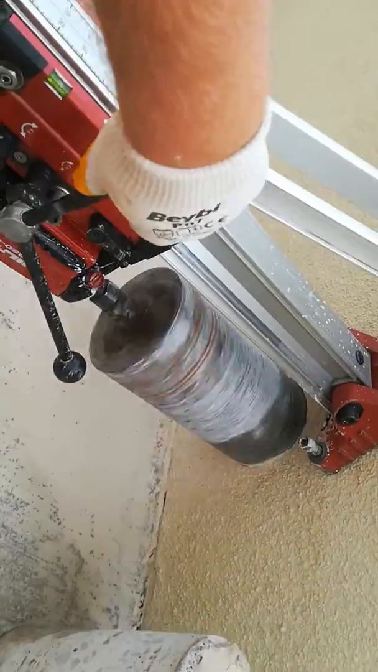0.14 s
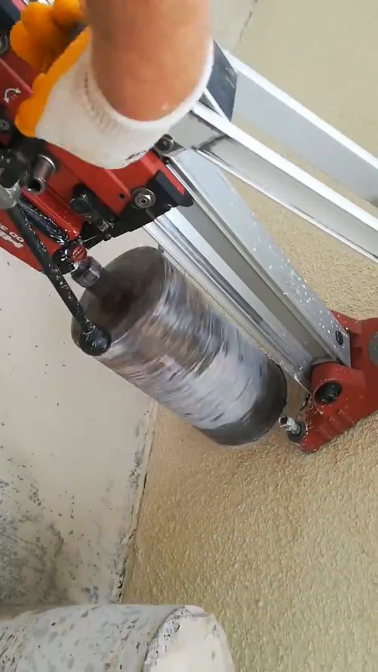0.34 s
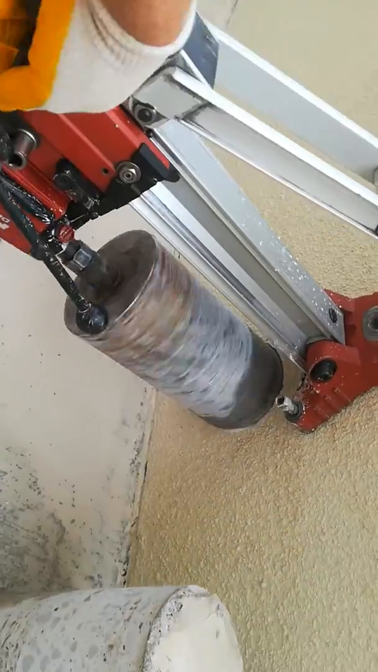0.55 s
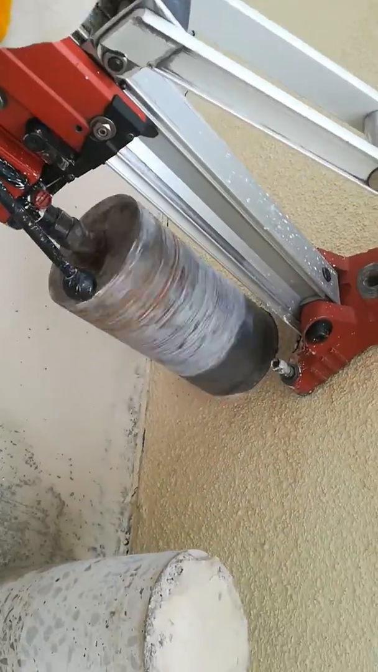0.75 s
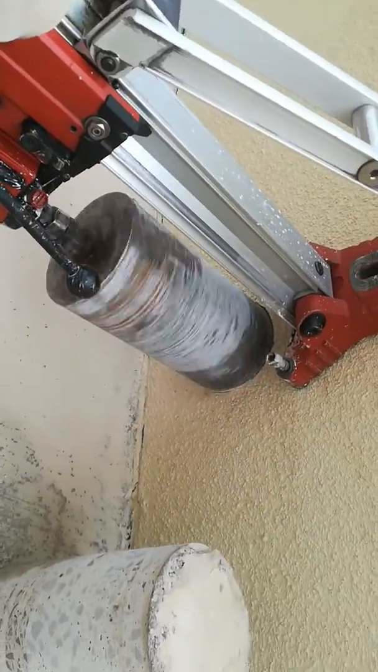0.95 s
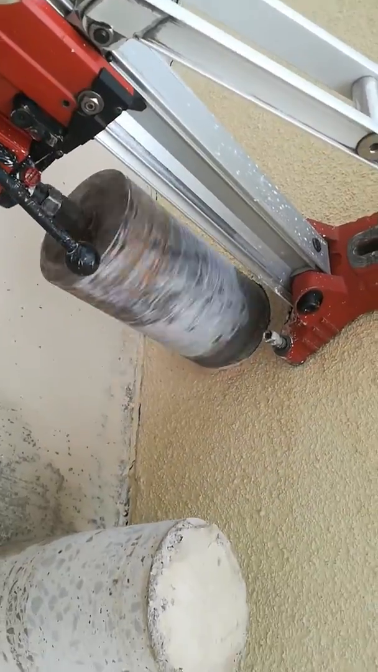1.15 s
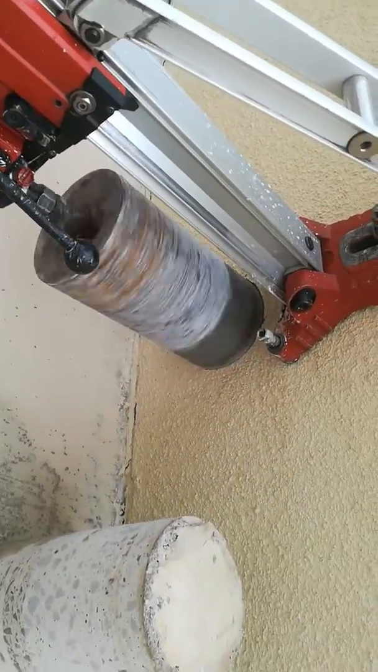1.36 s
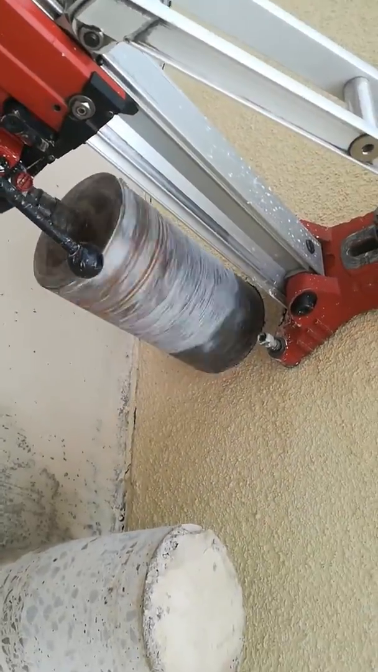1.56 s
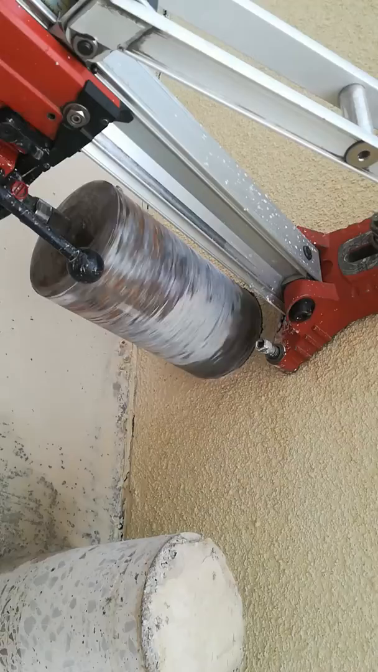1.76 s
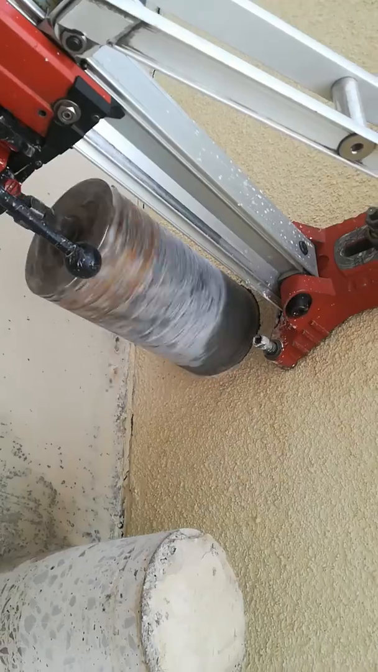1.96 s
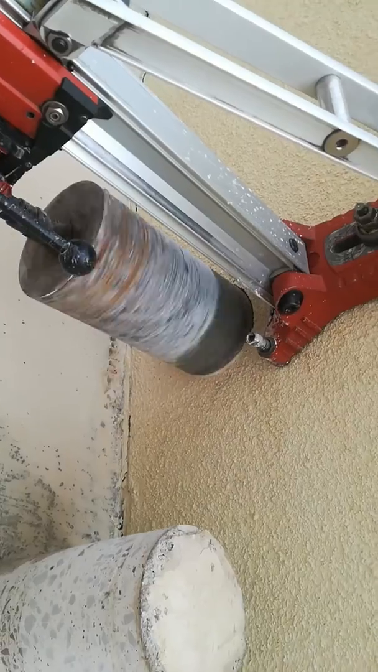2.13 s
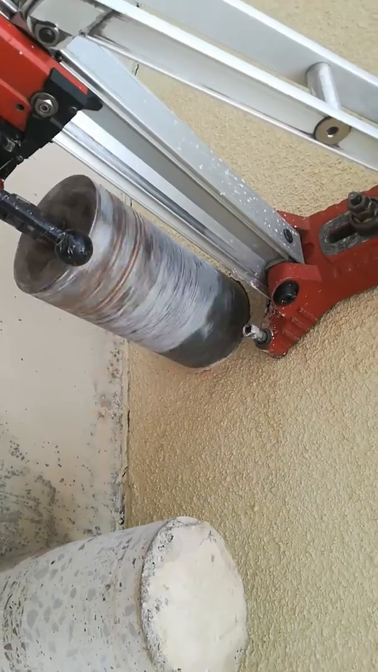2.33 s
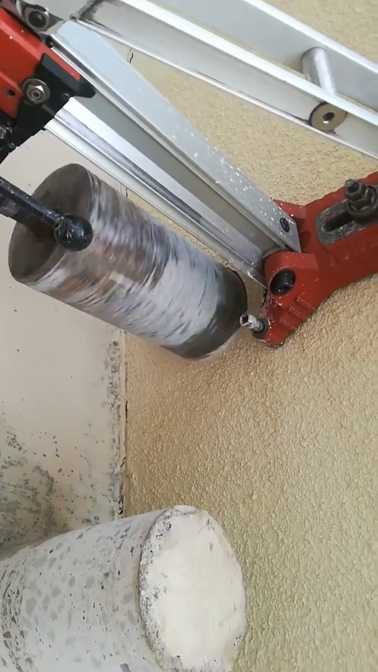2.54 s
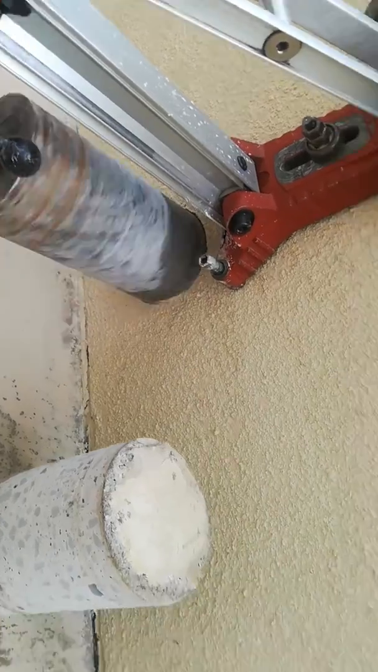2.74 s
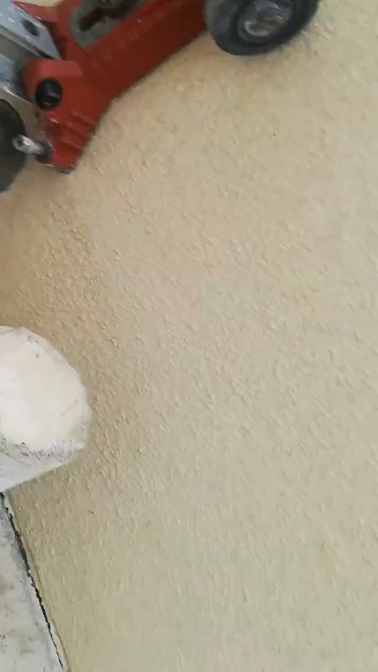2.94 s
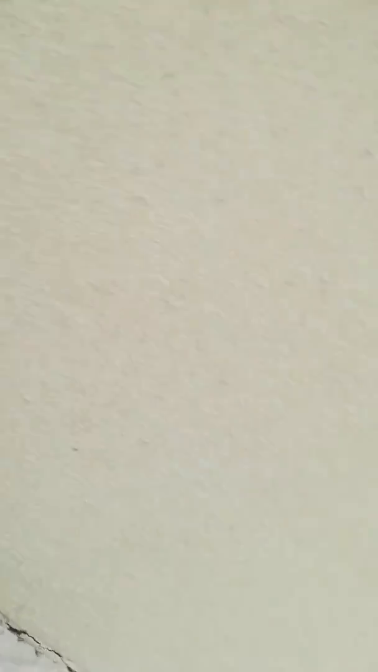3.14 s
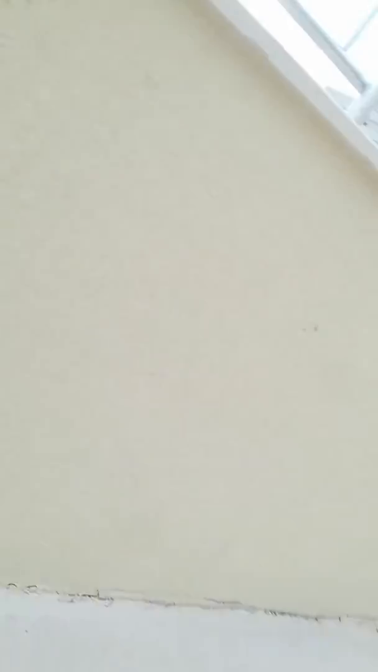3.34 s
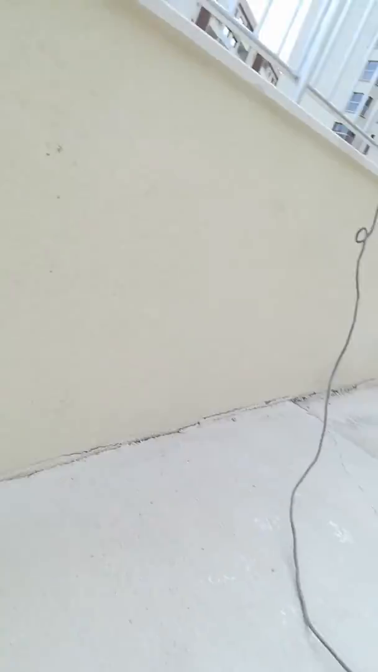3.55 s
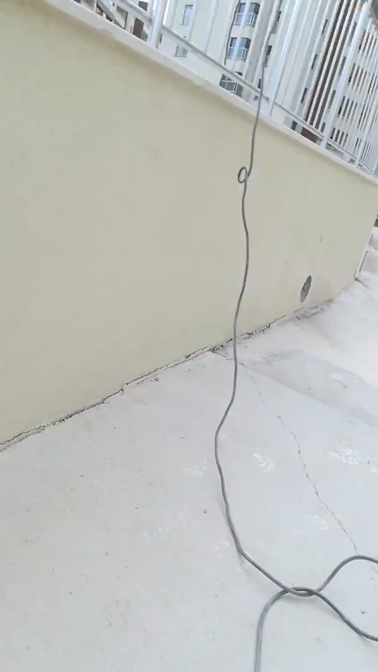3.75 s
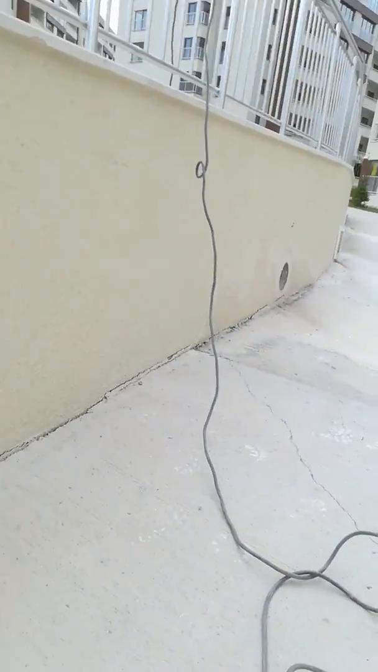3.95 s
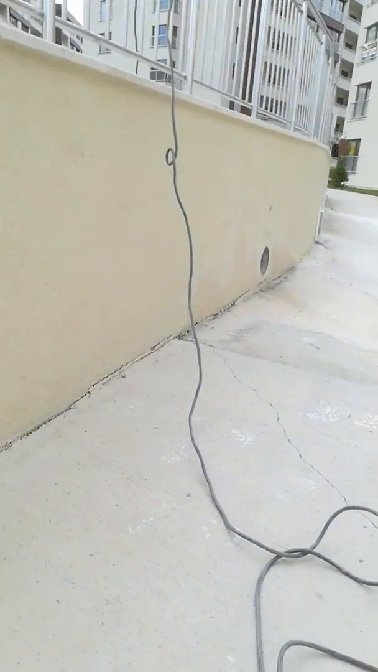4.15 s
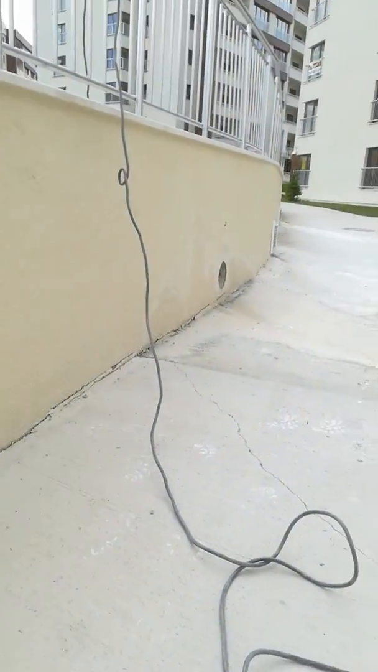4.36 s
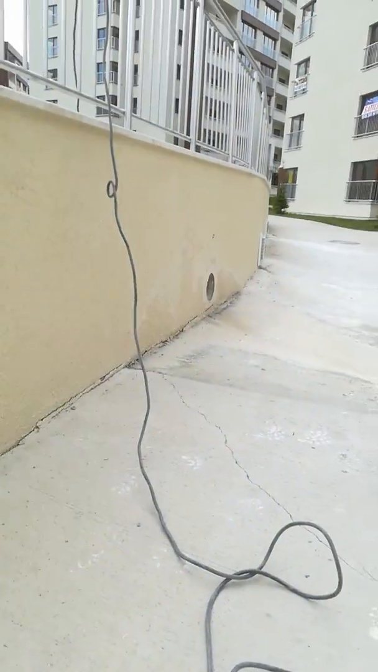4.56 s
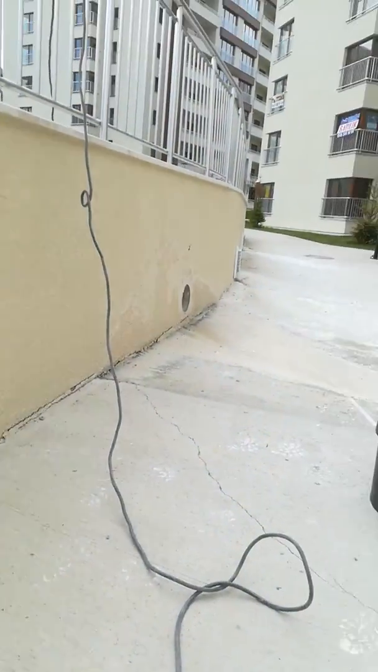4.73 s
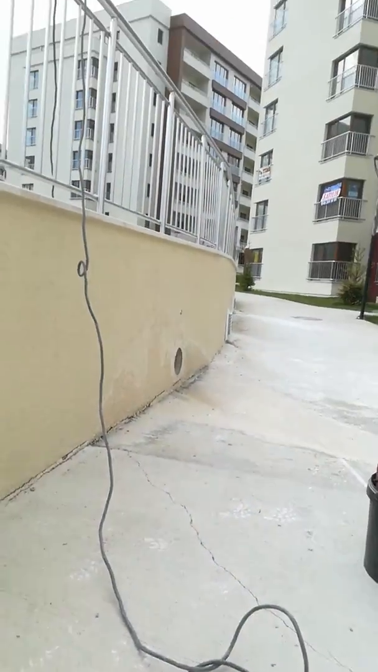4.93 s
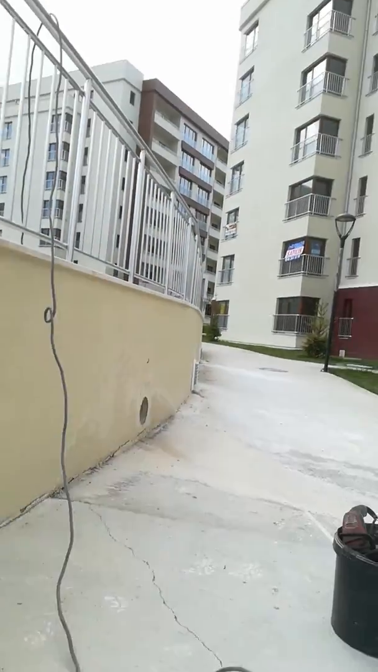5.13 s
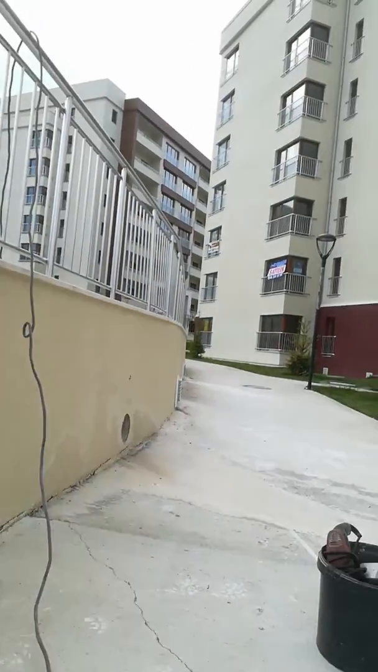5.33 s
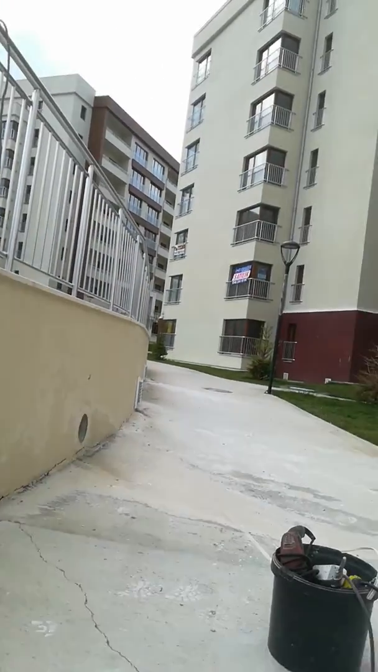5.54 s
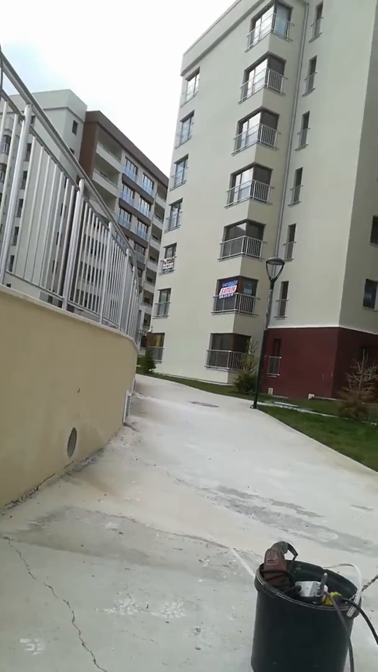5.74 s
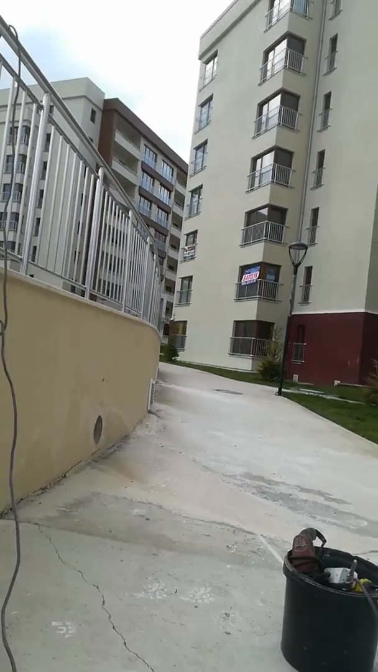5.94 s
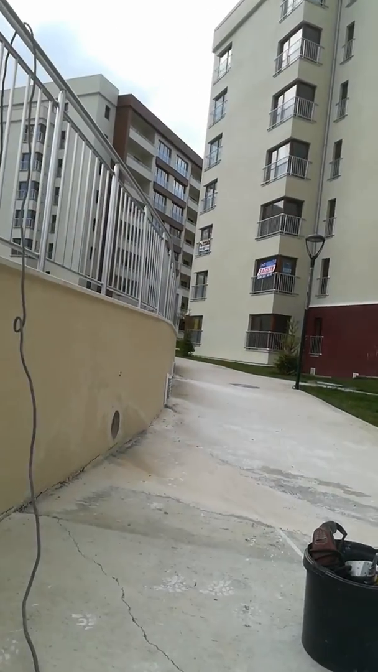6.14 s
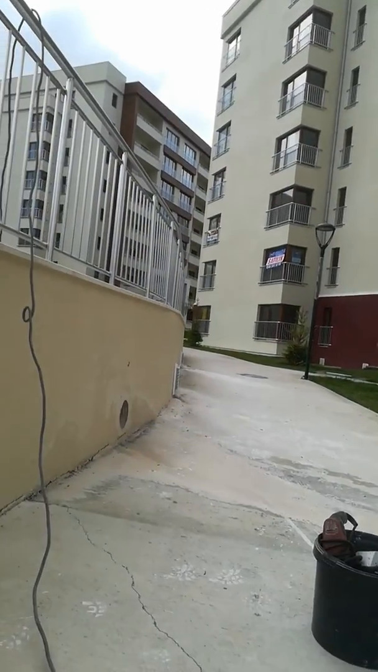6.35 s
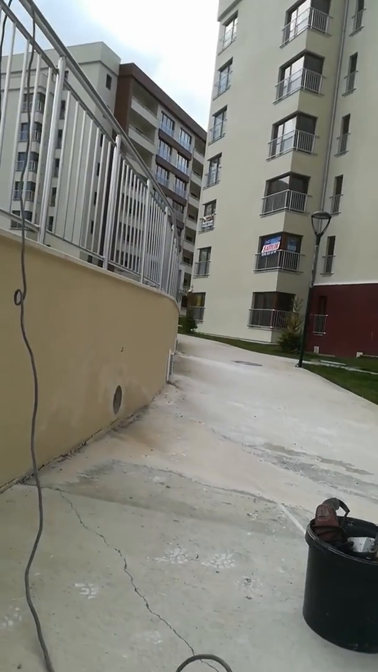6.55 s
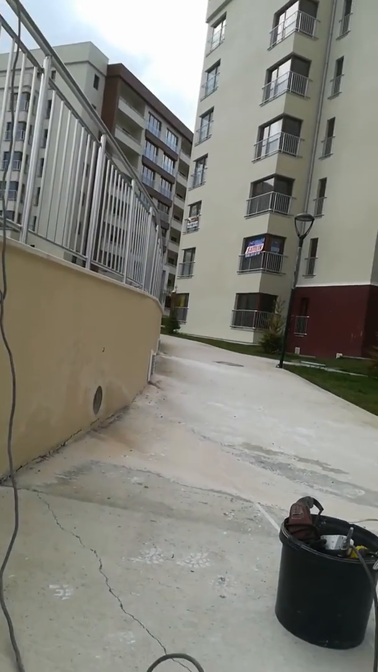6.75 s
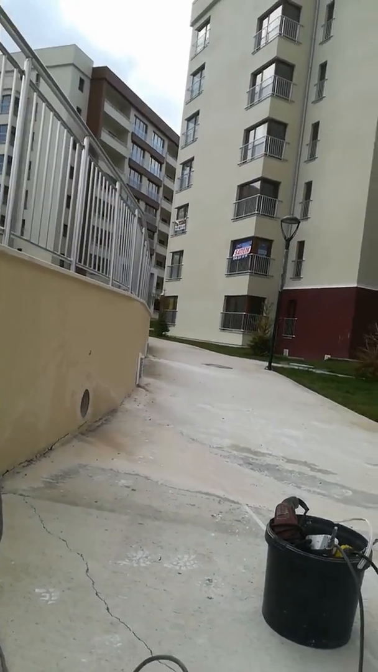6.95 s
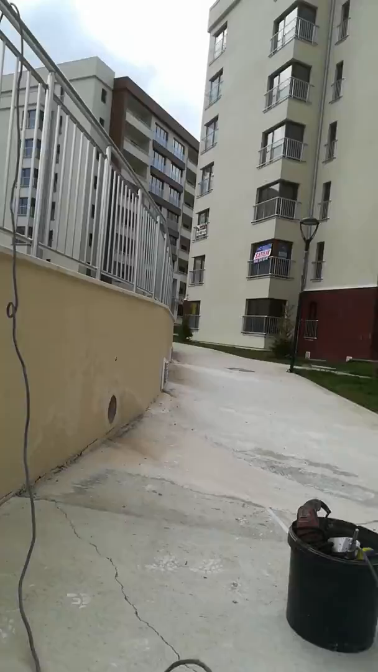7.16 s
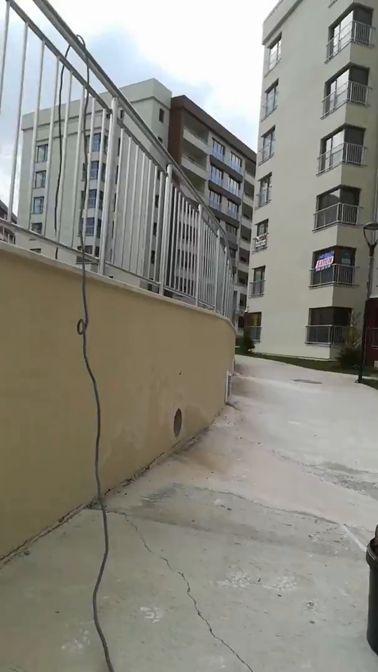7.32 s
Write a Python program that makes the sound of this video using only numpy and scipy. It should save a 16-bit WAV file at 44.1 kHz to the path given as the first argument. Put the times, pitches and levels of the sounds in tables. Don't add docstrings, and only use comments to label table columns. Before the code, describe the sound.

A core drill cuts concrete without pause, very loud and close. Its harsh, gritty rasp throbs around six times per second, with ringing metal in the barrel, a sharp tick each turn, low stand rumble and a buried motor hum. Heard outdoors on a handheld stereo phone, it begins slightly shaded, opens up bright, then after three seconds shifts to the left as the phone turns away.

```python
import sys
import numpy as np
from scipy import signal
from scipy.fft import rfft, irfft
from scipy.io import wavfile
from scipy.ndimage import uniform_filter1d, map_coordinates

SR = 44100
rng = np.random.default_rng(int(sys.argv[2]) if len(sys.argv) > 2 else 0)


def wav_record(signal):
    frames = np.transpose(np.atleast_2d(signal))
    bounded = np.clip(frames, -1, 1)
    quanta = np.round(bounded * 32767).astype(np.int16)
    wavfile.write(sys.argv[1], SR, quanta)


def nominal_scale(level):
    x = np.asarray(level, float) / 20
    return 10 ** x


N = 330309

# (time [s], speed [turns/s])
SPEED = [(0.15, 6.408), (0.45, 6.359), (1, 6.361), (2.43, 6.394), (2.65, 6.362), (3.6, 6.393),
         (4.01, 6.374), (5.15, 6.405), (6, 6.384), (7.49, 6.388)]


def read(points, hz):
    f, *columns = np.transpose(points)
    return np.array([np.interp(np.log(hz + 1), np.log(f + 1), c) for c in columns])


def follow(points, t):
    s, *columns = np.transpose(points)
    return np.array([np.interp(t, s, c) for c in columns])


def flutter(size):
    x = uniform_filter1d(uniform_filter1d(rng.standard_normal(N), size), size)
    return x / np.std(x)


def peak(hz, centre_hz, width_hz):
    return 1 / (1 + (2 * (hz - centre_hz) / width_hz) ** 2)


def bump(t, events):
    return sum(db * np.exp(-((t - at) / length) ** 2) for at, length, db in events)


def posture(t):
    # (time [s], pose [0 shaded by the hand, 1 facing, 2 turning, 3 side-on, 4 turned away])
    pose_path = [(0, 0.), (.28, 0.), (.36, 0.37), (.5, 0.5), (.7, 1.), (2.65, 1.), (2.9, 2.), (3.08, 2.),
                 (3.3, 2.5), (3.45, 3.), (3.6, 3.), (4.1, 4.), (7.49, 4.)]
    pose = np.clip(follow(pose_path, t)[0], 0, 4)
    weights = np.maximum(1 - abs(pose - np.arange(5)[:, None]), 0)
    away = np.clip((pose - 2) / 2.08, 0, 1)
    return weights, away


def rasp(angle, grit_db):
    # (frequency [Hz], share of the rasp that returns next turn [0-1], share surviving a further turn [0-1])
    groove_memory = [(100, 0.47, 0.98), (245, 0.69, 0.99), (605, 0.72, .95), (1000, 0.63, .93),
                     (1880, 0.84, .97), (2270, 0.55, 0.79), (4000, 0.39, 0.78), (8000, 0.07, 0.5)]
    tooth_steps = 6912
    turns = int(angle[-1]) + 2
    shape = (2, turns, tooth_steps)
    fresh = rng.standard_normal(shape) * nominal_scale(grit_db * rng.standard_normal(shape))
    chips, wear = rfft(fresh / np.std(fresh))
    returns, survives = np.clip(read(groove_memory, np.fft.rfftfreq(tooth_steps, 1 / SR)), 0, .999)
    groove = wear.copy()
    for k in range(1, turns):
        groove[k] = survives * groove[k - 1] + np.sqrt(1 - survives ** 2) * wear[k]
    surface = irfft(np.sqrt(returns) * groove + np.sqrt(1 - returns) * chips).ravel()
    return map_coordinates(surface, [angle * tooth_steps], order=1)


def bite(angle):
    # (angle [turns], half width [turns], level [dB])
    hard_stretches = [
        (.05, 0.075, 3.5),
        (.47, .15, 2.5),
        (.7, 0.13, 3.),
    ]
    hard_db = -2.
    for at, width, db in hard_stretches:
        offset = (angle - at + .5) % 1 - .5
        hard_db = hard_db + db * np.exp(-(offset / width) ** 2)
    lobes_db = hard_db * (1.08 + 0.23 * flutter(size=3000))
    return nominal_scale(lobes_db + 0.091 * flutter(size=500) + 0.76 * flutter(size=90))


def pose_colour(hz, weights):
    # (frequency [Hz], left level [dB], right level [dB])
    shaded = [(360, -23, -21), (550, -29, -25), (735, -27, -19), (903, -4.5, -6), (1170, -15.5, -17.5),
              (1540, -10, 1), (2250, -6, -1), (2550, -4, -6.5), (2850, -11.5, -3.5), (3800, -0.5, 0),
              (4800, -7.3, -9), (6400, -17.5, -12.0), (9300, -24.6, -20.5), (15000, -48, -38)]
    facing = [(360, -18, -21.5), (540, -21, -18.5), (726, -16.5, -16.6), (899, -4.5, -5.5),
              (1170, -14, -9.5), (1485, -3.5, -1), (2230, 0, 1), (2520, -1, -4.5), (2820, -0.6, -3.5),
              (3800, 5, 0.5), (4800, 0.5, -5.7), (6420, -10.5, -5.5), (9300, -20.5, -16),
              (14600, -33.2, -32.5)]
    turning = [(360, -20.3, -19), (550, -14, -20), (726, -14, -24), (874, -3.5, -8), (1170, -14, -10.5),
               (1480, -9, -0.5), (2250, -2.5, -1), (2550, -2, -9), (2850, 1, -11), (3800, 4, -4.5),
               (4800, -1.2, -1), (6530, -8.5, -3.5), (9400, -18.5, -17.6), (15000, -33, -19.5)]
    side_on = [(358, -21, -25.5), (550, -14.5, -22.7), (736, -16.5, -32), (910, -15, -14),
               (1170, -8.5, -11.5), (1440, -3, -8), (2190, -2, -10), (2550, -4, -15), (2880, 2, -15),
               (3850, 2, -1), (4640, 1.5, -14), (6540, -9, -17), (9250, -21.5, -26), (15000, -40, -37)]
    turned_away = [(352, -24, -31), (570, -12, -24.7), (730, -15, -22), (900, -13, -19), (1170, -13, -15),
                   (1410, -11, -19), (2190, -1.6, -15.5), (2530, -1.8, -20), (2870, 3.5, -18),
                   (3800, 0.15, -8.5), (4910, -0.46, -11), (6420, -7.5, -18), (9560, -19.5, -30),
                   (15000, -35.5, -49)]
    colours_db = np.array([read(p, hz) for p in (shaded, facing, turning, side_on, turned_away)])
    return np.einsum("pcf,pt->cft", colours_db, weights)


def body_colour(hz, away):
    # (frequency [Hz], width [Hz], facing left [dB], facing
    # right [dB], away left [dB], away right [dB])
    body_modes = [(413, 44, 3.5, -2, 5.5, 5), (496, 50, -3.5, -3, -2.5, -1), (603, 68, 0.5, 0, 3, -0.0),
                  (700, 70, 2, -1.5, 0.6, -4), (746, 40, -4, -3.5, -7, -2), (808, 43, 1.8, 4, 7, 8.5),
                  (857, 40, 2.1, 3, 1, -0.5), (944, 50, 3.2, 2, -4, -0.4), (1060, 57, 3.8, -6, -2, 3),
                  (1100, 55, 0.4, -17, 7.5, 5), (1323, 180, -5, -1, -6.5, -5),
                  (1640, 40, 0, 4.5, 7.5, -3), (1765, 74, -5, -2.7, -1, 3.7),
                    (1785, 44, -1.5, 1.5, -10, -1), (1965, 113, -8, -5.5, -2.5, -2),
                    (2155, 76, 5.5, 1.5, 4, 4), (2515, 64, -3, -10, -5.5, -2.2), (2808, 62, 4, 6, 2.5, -2),
                    (3240, 75, 3, -0.5, -2.8, 8), (3357, 170, -5.5, -3.5, -4, 0),
                    (4230, 180, -0.5, 1.5, 3.5, 3.7), (4660, 130, 2.5, -4, -2, 4.5),
                    (5350, 300, -2, 3, -3, -11), (6050, 150, 0, -4, -2.7, 3),
                    (7630, 1600, 1.7, 2, -2.2, -2.5)]
    body_db = 0
    for centre_hz, width_hz, *lifts_db in body_modes:
        body_db = body_db + np.outer(lifts_db, peak(hz, centre_hz, width_hz))
    crowd = uniform_filter1d(rng.standard_normal((4, len(hz))), size=6, axis=1)
    body_db = body_db + 3.1 * crowd * np.clip(hz / 2500 - 1, 0, 1)
    return body_db[:2, :, None] * (1 - away) + body_db[2:, :, None] * away


def phone_shadow(hz, t):
    turned = np.clip((t - 2.85) / (3.5 - 2.85), 0, 1)
    shadow_hz = 3740 + (2400 - 3740) * turned
    depth_db = -2.5 - 2 * np.sin(np.pi * turned ** .6)
    shadow_db = depth_db * peak(hz[:, None], shadow_hz, width_hz=460)
    glare_db = np.outer(peak(hz, 5800, width_hz=1100), bump(t, [(2.95, .17, 3.5)]))
    return shadow_db + glare_db


def barrel_rings(hz, weights):
    # (frequency [Hz], split [Hz], width [Hz], left level per pose [dB], right level per pose [dB])
    ring_pairs = [
        (1609, 22, 16, (0, 0.41, -2, 1, 0.57), (12, 5.5, 2, -10, -7)),
        (1870, 26, 17, (4, 8, -8, -17, -4), (5, 6, 2.5, 8, -6)),
        (3690, 70, 83, (-3, 0.5, -6, -8, -9), (2, -2, -9, -5, -17)),
    ]
    power = 0
    for centre_hz, split_hz, width_hz, *levels_db in ring_pairs:
        lower = peak(hz, centre_hz - split_hz / 2, width_hz) ** 2.0
        upper = peak(hz, centre_hz + split_hz / 2, width_hz) ** 3.9
        power = power + (lower + upper)[:, None] * nominal_scale(2 * np.array(levels_db) @ weights)[:, None]
    return power


def ring_glints(hz, t):
    # (time [s], length [s], level [dB])
    glint_events = [
        (4.1, .3, 8.),
        (5.3, .4, 3.),
        (7.15, .35, 9.),
    ]
    return np.outer(peak(hz, 1870, width_hz=30), bump(t, glint_events))


def rumble(hz, away):
    # (frequency [Hz], left level [dB], right level [dB])
    rumble_levels = [(20, -34., -34.), (50, -24, -23.), (68, -25., -29), (82.4, -22.5, -21),
                     (115, -18, -16.5), (174, -21.5, -21.5), (217, -14.5, -16), (306, -16, -16.5),
                     (400, -47, -47)]
    return nominal_scale(2 * read(rumble_levels, hz))[:, :, None] * nominal_scale(-4. * away) * (hz < 600)[:, None]


def ports(hz, t):
    # (time [s], feed pressure [dB])
    feed = [(0, .5), (.4, 1.3), (.6, 0), (.9, 1), (1.3, 0.24), (2.1, 0.2), (2.4, 1), (2.8, .3), (3.25, 1.5),
            (3.5, 0.5), (4.6, 0.93), (6.3, .5), (7, 1.35), (7.3, 0.3), (7.49, 1.1)]
    weights, away = posture(t)
    level_db = pose_colour(hz, weights) + body_colour(hz, away)
    level_db[1] += phone_shadow(hz, t)
    power = nominal_scale(2 * level_db) * np.clip(hz[:, None] / 340, 0, 1) ** 8
    power += barrel_rings(hz, weights)
    power[0] *= nominal_scale(2 * ring_glints(hz, t))
    power *= nominal_scale(2 * follow(feed, t))
    power += rumble(hz, away)
    return np.sqrt(power)


def port_pair(near, far, hz, weights, away):
    # (frequency [Hz], likeness facing [0-1], likeness away [0-1])
    likeness = [(30, .995, .995), (70, 0.99, .99), (130, 0.94, 0.95), (269, 0.86, 0.73), (500, 0.37, 0.3),
                (865, 0.87, 0.86), (1400, 0.69, .55), (2400, 0.49, 0.72), (3500, 0.3, 0.35),
                (5500, 0.14, 0.23), (9000, 0.34, .2)]
    # (frequency [Hz], lead [rad])
    lead_facing = [(0, 3), (430, 2.1), (950, -0.8), (1890, 1.7), (2150, 0.43), (3620, 0.14), (4910, 5),
                   (6370, 10), (9820, -3), (11300, -1.5), (14500, 2), (15800, -4)]
    lead_turning = [(0, 11), (1290, -0.0), (3190, 6.5), (7920, 16.5), (9730, 15), (11900, 26), (13000, 9.6),
                    (14000, 10.4), (14400, 6.7), (15800, 20.2)]
    lead_away = [(0, 5), (430, 1.0), (780, 4.5), (1550, 6.5), (2240, 3.5), (2840, 4), (3190, 2),
                 (3960, 1.4), (6460, 9.4), (13900, 2.5), (14800, 2), (15800, -0.1)]
    facing_same, away_same = read(likeness, hz)[:, :, None]
    same = np.clip(facing_same + away * (away_same - facing_same), 0, 1)
    spaced = np.clip(hz / 520, 0, 1) ** 2
    poses = (lead_facing, lead_facing, lead_turning, lead_away, lead_away)
    leads = np.array([read(p, hz)[0] for p in poses])
    lag = np.exp(-1j * spaced * leads).T @ weights
    right = same * lag / (abs(lag) + 1e-9) * near + np.sqrt(1 - same ** 2) * far
    return np.array([near, right])


def cutting():
    # (frequency [Hz], reach of the throb [0-1])
    throb_reach = [(300, 0.87), (1200, 0.32), (2600, 0.98)]
    # (frequency [Hz], microphone response [dB])
    microphone = [(2000, 0.), (5000, 0.49), (8000, 1.53), (9500, 1.6), (10800, -0.7), (13000, 1.5),
                  (15000, 4.5), (15700, 8), (15900, -60.)]
    # (time [s], length [s], level [dB])
    slips = [
        (0.064, .01, -5),
        (0.218, 0.0081, -8),
        (0.227, 0.0035, 2),
        (.57, .02, 2),
        (3.482, .012, -2),
        (4.209, .015, -1.5),
        (5.43, .02, 1),
    ]
    frame = 4096
    overlap = frame * 3 // 4
    t = np.arange(N) / SR
    angle = np.cumsum(follow(SPEED, t)[0] * (1 + .0015 * flutter(size=1500))) / SR
    steady = np.array([rasp(angle, grit_db=2.), rasp(angle, grit_db=1.5)])
    throbbing = steady * bite(angle)
    hz, s, z = signal.stft([steady, throbbing], SR, nperseg=frame, noverlap=overlap)
    reach = np.clip(read(throb_reach, hz).T, 0, 1)
    near, far = (1 - reach) * z[0] + reach * z[1]
    pair = port_pair(near, far, hz, *posture(s))
    patches = uniform_filter1d(rng.standard_normal(near.shape[::-1]), size=50, axis=1).T
    swell_db = 1.04 * np.clip(hz / 3000, 0, 1)[:, None] * patches / np.std(patches)
    heard = pair * ports(hz, s) * nominal_scale(read(microphone, hz).T + swell_db)
    sound = signal.istft(heard, SR, nperseg=frame, noverlap=overlap)[1][:, :N]
    slips_db = sum(db * np.exp(-((t - at) / length) ** 6) for at, length, db in slips)
    return nominal_scale(-7 + slips_db) * sound


def ringing(hz, width_hz):
    x = signal.lfilter(*signal.iirpeak(hz, hz / width_hz, SR), rng.standard_normal(N))
    return x / np.std(x)


def tooth_strikes():
    # (frequency [Hz], width [Hz], left level [dB], right level [dB], change when away [dB])
    struck_modes = [
        (3190, 110, -22, -27, -20),
        (3620, 120, -30, -31, -21),
    ]
    t = np.arange(N) / SR
    angle = np.cumsum(follow(SPEED, t)[0]) / SR
    away = posture(t)[1]
    blow = np.exp(-((angle % 1 - 0.042) / 0.037) ** 2)
    out = np.zeros((2, N))
    for hz, width_hz, left_db, right_db, away_db in struck_modes:
        strength = nominal_scale(away_db * away + 3.7 * flutter(size=4000)) * np.clip(t / .6, 0, 1)
        out += np.outer(nominal_scale([left_db, right_db]), blow * strength * ringing(hz, width_hz))
    return out


def single_knock():
    # (time [s], length [s], frequency [Hz], width [Hz], level [dB])
    knock_modes = [
        (4.475, .025, 810, 90, -37),
        (4.478, .03, 1170, 120, -32),
    ]
    t = np.arange(N) / SR
    out = np.zeros((2, N))
    for at, length, hz, width_hz, db in knock_modes:
        envelope = np.exp(-((t - at) / length) ** 2)
        out += nominal_scale(db) * envelope * ringing(hz, width_hz) * nominal_scale([[0], [-4.]])
    return out


def motor():
    # (frequency [Hz], left level [dB rms], right level [dB rms], change when away [dB])
    hum_tones = [(81, -62.5, -62.5, 2), (114.5, -61, -62, 2), (267.5, -54, -55.5, -8),
                 (300, -47.5, -48.5, -4), (584, -60, -64.5, 4), (1605, -44, -33.5, -9)]
    away = posture(np.arange(N) / SR)[1]
    out = np.zeros((2, N))
    for hz, left_db, right_db, away_db in hum_tones:
        tone = np.sin(2 * np.pi * np.cumsum(hz * (1 + 0.0036 * flutter(size=3000))) / SR)
        strength = nominal_scale(away_db * away + 3.6 * flutter(size=600))
        out += np.sqrt(2) * np.outer(nominal_scale([left_db, right_db]), tone * strength)
    return out


def scene():
    return cutting() + tooth_strikes() + single_knock() + motor()


def roll_off(x):
    return signal.sosfilt(signal.butter(12, 15830, fs=SR, output="sos"), x)


def record(dry):
    mix = 1.255 * np.tanh(dry / 1.245)
    return roll_off(mix)


dry = scene()
out = record(dry)
wav_record(out)
```